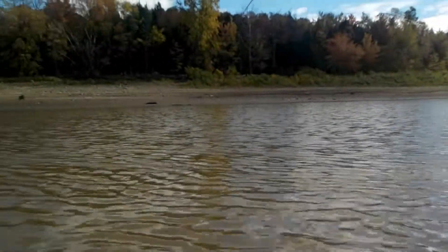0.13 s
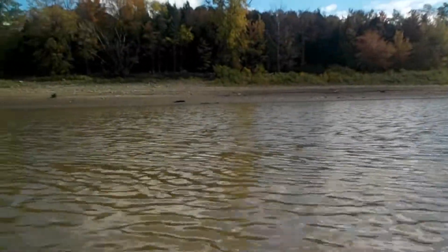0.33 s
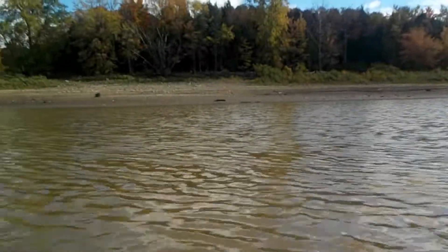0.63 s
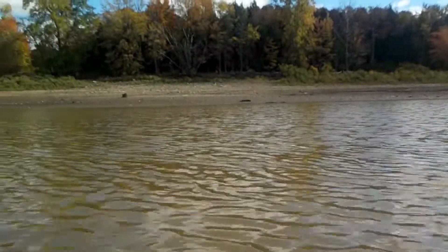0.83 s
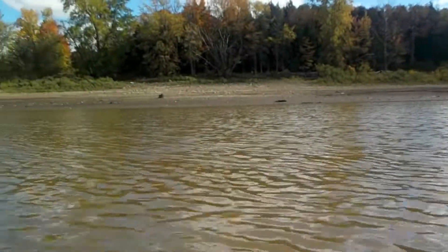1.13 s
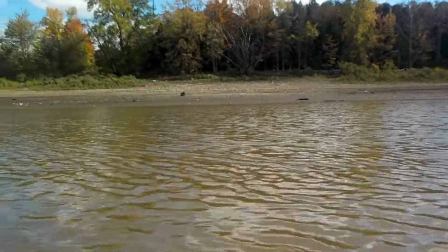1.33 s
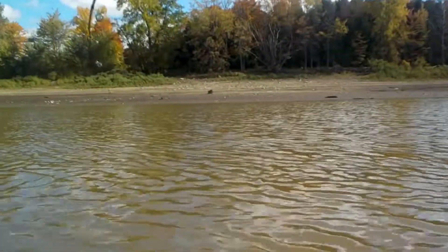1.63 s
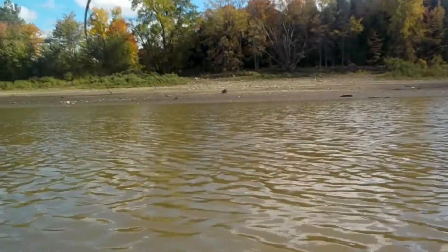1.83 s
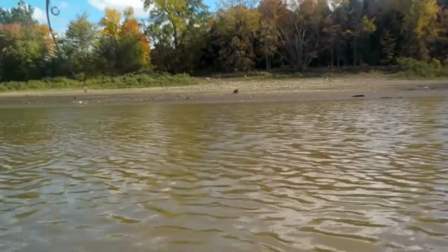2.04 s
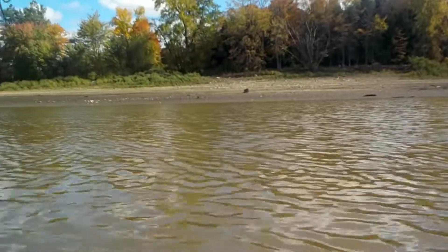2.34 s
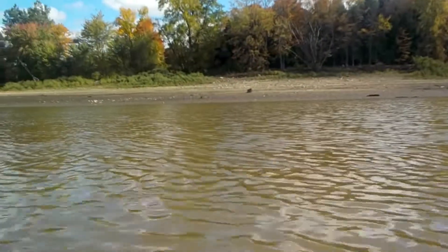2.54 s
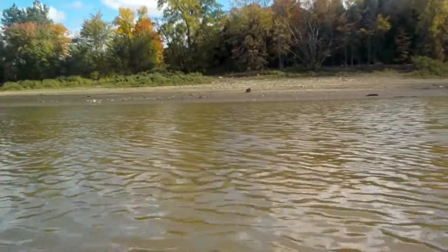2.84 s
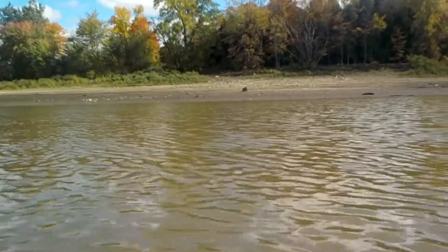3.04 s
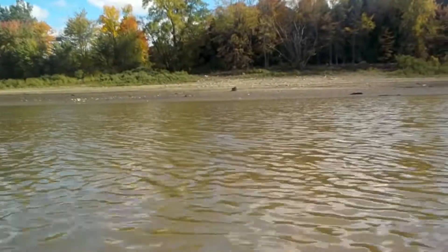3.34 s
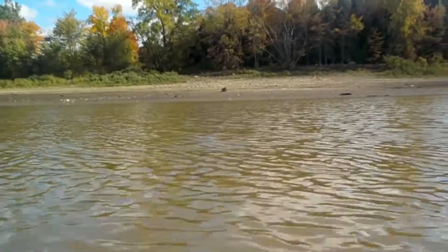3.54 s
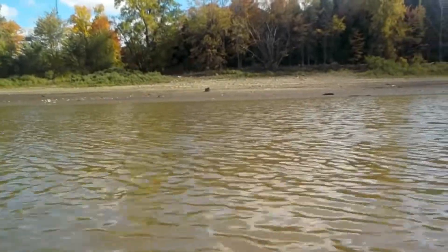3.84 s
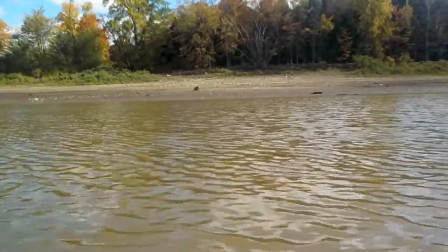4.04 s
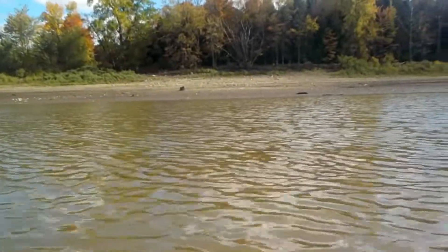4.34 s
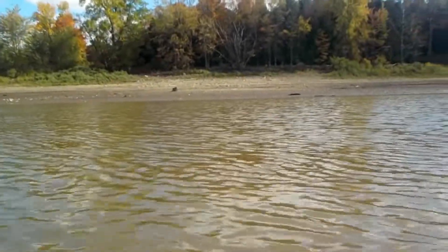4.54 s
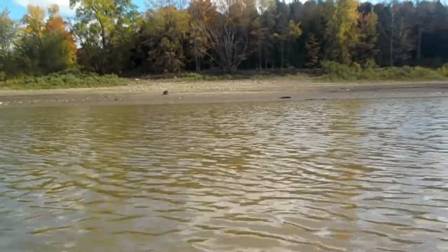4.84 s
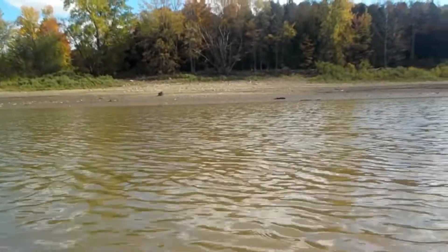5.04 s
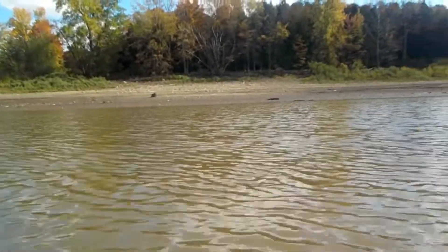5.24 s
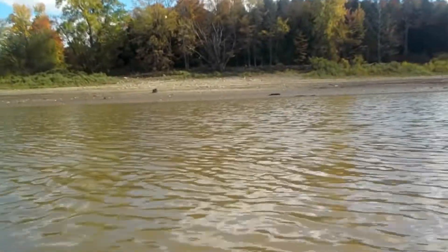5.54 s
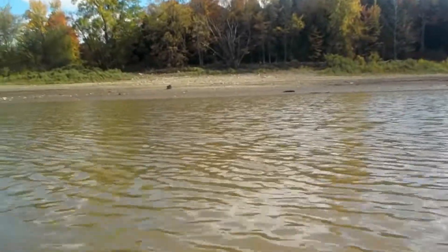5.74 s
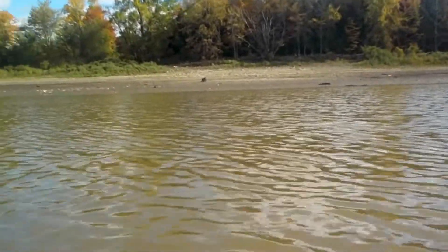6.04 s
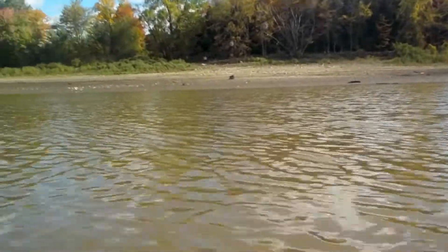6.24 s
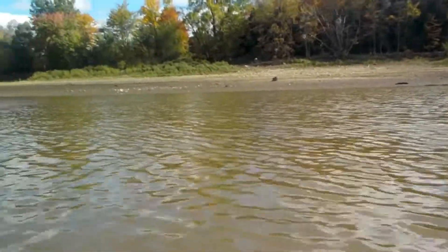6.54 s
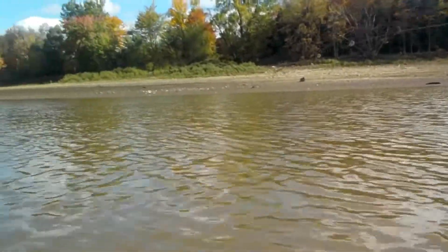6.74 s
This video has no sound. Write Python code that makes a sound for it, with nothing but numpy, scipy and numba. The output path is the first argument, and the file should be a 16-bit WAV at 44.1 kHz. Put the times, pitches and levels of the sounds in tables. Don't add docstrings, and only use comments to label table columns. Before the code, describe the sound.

Close metallic reel clicks quicken to a buzz, stop and restart, pause with small knocks, then burst into a rapid drag scream by quiet water.

```python
import sys
import numpy as np
from scipy import signal
from scipy.fft import rfft, irfft
from scipy.io import wavfile
from scipy.ndimage import uniform_filter1d, map_coordinates
from numba import njit

SR = 44100
rng = np.random.default_rng(int(sys.argv[2]) if len(sys.argv) > 2 else 0)


def master_out(mix):
    frames = np.transpose(np.atleast_2d(mix))
    ceiling = np.clip(frames, -1, 1)
    pcm = np.round(ceiling * 32767).astype(np.int16)
    wavfile.write(sys.argv[1], SR, pcm)


def ratio_of_db(decibels):
    return 10 ** (np.asarray(decibels, float) / 20)


N = 303408


def curve(rows):
    s, *columns = np.transpose(rows)
    return [np.interp(np.arange(N) / SR, s, column) for column in columns]


def across(points):
    hz, value = np.transpose(points)
    return np.interp(np.log(np.arange(N // 2 + 1) * SR / N + 1), np.log(hz + 1), value)


def walk(rate_hz):
    hold = int(SR / rate_hz)
    steps = np.repeat(rng.standard_normal(N // hold + 1), hold)
    return 1.5 * uniform_filter1d(uniform_filter1d(steps, hold), hold)[:N]


@njit
def mode(x, pole):
    y, z = np.empty(len(x)), 0j
    for i in range(len(x)):
        z = z * pole[i] + x[i]
        y[i] = z.imag
    return y


def resonate(x, hz, width_hz):
    r = np.exp(-np.pi * width_hz / SR)
    return signal.lfilter([1 - r], [1, -2 * r * np.cos(2 * np.pi * hz / SR), r * r], x)


def place(at, shapes):
    out = np.zeros(N + shapes.shape[1], shapes.dtype)
    np.add.at(out, at[:, None] + np.arange(shapes.shape[1]), shapes)
    return out[:N]


# pitch_hz, level_db (rms), wander_hz
FAR_TONES = [
    (102.5, -86, .6),
    (12091, -89, 1.0),
]


def far_tones():
    out = 0
    for hz, db, wander_hz in FAR_TONES:
        level = np.sqrt(2) * ratio_of_db(db + 0.83 * walk(3.13))
        out = out + level * np.sin(2 * np.pi * np.cumsum(hz + wander_hz * walk(3.27)) / SR)
    return out


# pitch_hz, level_db (per Hz)
RIVER_SPECTRUM = [(25, -126), (80, -116), (200, -108), (450, -99), (900, -91.5), (1700, -99), (2200, -106),
                  (3000, -114), (3700, -110), (5300, -106), (7200, -112), (9000, -115), (11000, -110),
                  (15500, -108)]
# pitch_hz, likeness (0-1)
RIVER_ALIKE = [(60, 0.95), (130, 0.76), (290, 0.6), (640, 0.88), (1410, 0.78), (3100, 0.94), (6820, 0.43),
               (15000, 0.53)]
# pitch_hz, level_db
RIVER_PAN = [(60, -1), (110, -23), (200, 6), (380, -4.5), (700, -3), (1290, -3), (2380, -1), (4400, -5),
             (8120, -8), (15000, -8)]
RIVER_DB = -60.5


def river():
    alike, side = np.clip(across(RIVER_ALIKE), 0, 1), np.array([[1], [-1]])
    mid, wide = rfft(rng.standard_normal((2, N)))
    mixed = np.sqrt(1 + alike) * mid + side * np.sqrt(1 - alike) * wide
    full = mixed * ratio_of_db(across(RIVER_SPECTRUM) + side * across(RIVER_PAN) / 2)
    octave = across([(20, np.log2(20)), (20480, np.log2(20480))])
    out = 0
    for centre in np.arange(4, 16, 2):
        band = irfft(full * np.clip(1 - np.abs(octave - centre) / 2, 0, 1), N)
        flicker_db = (centre < 13) * (0.7 * walk(1.5) + 0.8 * walk(12))
        out = out + band * ratio_of_db(flicker_db)
    out = out * ratio_of_db(RIVER_DB) / np.sqrt(np.mean(out.mean(axis=0) ** 2))
    return out + far_tones()


# start_s, length_s, level_db
RUB = [
    (0.391, 0.34, -53.5),
    (1.024, 2.44, -62),
    (3.49, .24, -67.5),
]
RUB_SAG = (-41, -0.5, -10)
RUB_HZ, RUB_WIDTH_HZ = 1611, 31.6
RUB_ATTACK_S, RUB_RELEASE_S = 0.033, 0.074


def hum():
    t, loud = np.arange(N) / SR, 0
    for (s, length, db), sag_db in zip(RUB, RUB_SAG):
        swell = np.clip((t - s) / RUB_ATTACK_S, 0, 1)
        release = np.clip(1 + (s + length - t) / RUB_RELEASE_S, 0, 1)
        sagging = ratio_of_db(db + sag_db * np.clip(t - s - RUB_ATTACK_S, 0, length))
        loud = loud + swell * release * sagging
    return loud * resonate(rng.standard_normal(N), RUB_HZ, RUB_WIDTH_HZ) * 8.4


# start_s, level_db (peak), pitch_hz, width_hz, t60_s
KNOCKS = [(3.597, -53, 2300, 900, .03), (3.737, -47.5, 5860, 1480, 0.13), (3.841, -51.5, 5360, 1200, .02),
          (4.227, -80, 1500, 1500, .02), (4.361, -40, 1820, 970, 0.032), (4.358, -44, 6000, 2960, 0.035),
          (4.625, -54, 2200, 1800, 0.024), (4.845, -48, 3500, 4000, 0.032), (4.907, -37, 4940, 4000, 0.011),
          (5.047, -42.5, 1160, 1480, 0.014), (5.231, -48, 900, 900, 0.022), (5.31, -48.5, 1690, 1400, 0.59),
          (5.37, -47, 5000, 3000, 0.012), (5.681, -50, 515, 120, 0.68), (6.19, -43, 690, 300, 0.056),
          (6.835, -56, 131, 110, 0.11)]


def knocks():
    out, t = np.zeros(N), np.arange(6000) / SR
    for s, db, hz, width_hz, t60_s in KNOCKS:
        envelope = np.exp(-np.log(1000) * t / t60_s) * np.minimum(t / 0.0012, 1)
        burst = rng.standard_normal(len(t)) * envelope
        burst = signal.lfilter(*signal.iirpeak(hz, hz / width_hz, SR), burst)
        out += place(np.array([int(s * SR)]), ratio_of_db(db) * burst[None] / np.abs(burst).max())
    return out


# start_s, level_db (snap peak), ring_db
TICKS = [(0.0054, -37.5, -55.5), (0.0446, -36.5, -52.5), (0.094, -34.5, -59.5), (0.1388, -31.5, -68),
         (0.178, -32.5, -53.5), (0.2193, -33, -51), (0.252, -34.5, -54), (0.288, -35.5, -63),
         (0.3251, -37, -57), (0.358, -36.5, -53), (0.387, -40, -53.5), (0.414, -41.5, -48.5),
         (0.444, -39.5, -62), (0.4741, -35.5, -60), (0.506, -36.5, -55), (0.5392, -34, -54),
         (0.5761, -36, -55.5), (0.6193, -36.5, -73), (0.6842, -38.5, -57), (0.784, -37, -55),
         (0.8615, -35, -52.5), (0.9252, -38, -50), (0.982, -39, -59), (1.046, -35, -60.5),
         (1.1025, -33.5, -55), (4.122, -33.5, -63.5), (5.442, -36.5, -64.5), (5.5155, -39, -66),
         (5.5566, -42, -61), (5.5854, -38, -56)]
TICK_DB = 23.5


def lone_ticks():
    start_s, snap_db, ring_db = np.transpose(TICKS)
    face_db = 1.6 * rng.standard_normal((len(start_s), 4)) * [0, 1, 1, 1]
    return np.c_[start_s * SR, snap_db + TICK_DB, ring_db, face_db]


# start_s, speed_teeth_per_s
FIRST_PULL = [
    (1.14, 28.0),
    (1.179, 48.1),
    (1.402, 85.1),
    (1.528, 89.4),
    (1.606, 125.9),
    (1.701, 144.6),
    (1.776, 108.3),
    (1.849, 42.7),
]
SECOND_PULL = [
    (2.092, 59.0),
    (2.146, 83.9),
    (2.316, 70.3),
    (2.534, 25.3),
]
THIRD_PULL = [
    (2.74, 76.4),
    (2.89, 82.7),
    (3.081, 53.7),
    (3.18, 79.8),
    (3.303, 54.6),
    (3.422, 102.5),
    (3.507, 16.6),
]
# start_s, speed_teeth_per_s
DASH = [
    (5.603, 76),
    (5.645, 76),
    (5.723, 509.7),
    (5.801, 640.2),
    (5.963, 269.1),
    (6.049, 222.2),
    (6.116, 115.0),
]
SECOND_DASH = [
    (6.167, 148),
    (6.305, 482),
    (6.372, 355),
    (6.426, 302),
    (6.53, 270),
    (6.562, 245),
    (6.6, 255),
    (6.655, 190),
    (6.88, 211),
]
# once_db, once_tooth, twice_db, twice_tooth (per turn)
FACES = [
    (2.4, 1.6, 0.8, 1.8),
    (0.7, 12, 2.3, 8.9),
    (1, 9.8, 2.3, 8.5),
    (1.6, 1.2, 2.2, 9.6),
]
DASH_FACES = [
    (2.2, 2, 1, 0.5),
    (3, 16, 2.6, 6.2),
    (2.8, 16.3, 2.6, 6.5),
    (2, 18.5, 1.7, 9),
]
FIRST_TOOTH = 0, 13
TURN_DEPTH = 1.2, .95
SNAP_DB = (-13, -13.5)
SNAP_SLOPE = (0.17, 0.3)
RING_DB = (-22, -20)
RING_FADE = (-4, -7.5)
TOOTH_SCATTER_DB = np.array([.8, 1.1, 1.1, 1.1])
TOOTH_JITTER = 0.014
RING_SCATTER_DB, RING_DRIFT_DB = 3, 2
TEETH_PER_TURN = 20
# start_s, body_hz, body_db (to snap), high_ring_db (to low ring), cover_db
GRIP = [(0, 2040, -21.5, -2, 0), (.12, 1930, -23, -25, 0), (.25, 1880, -13.5, -9, 0),
        (.42, 1890, -7, -10, 0), (.54, 1820, -28, -20, 0), (.62, 1800, -19, 9.5, 0),
        (.79, 1880, -36, -5, 0), (1.05, 1800, -15.5, 2, -0.5), (1.3, 2100, -18.5, -15, 0),
        (1.55, 2050, -18, -8, -1), (1.72, 1760, -9, -6, 0), (2.2, 1712, -5.5, -21, 2.5),
        (3.2, 1717, -4, -19, -0.5), (3.45, 1700, -8.5, -12, 2.5), (5.45, 1720, -12.5, 2, -10),
        (5.62, 1770, -2, -12, -1.5), (5.8, 1698, -5.5, -1, 1), (6.88, 1720, -5.5, -6, 2)]


def spool_run(speeds, faces, first_tooth, depth, snap_db, slope_db, ring_db, fade_db):
    start = int(speeds[0][0] * SR)
    rate = curve(speeds)[0][start:int(speeds[-1][0] * SR) + 40]
    turned = np.cumsum(rate) / SR
    tooth = np.arange(int(turned[-1]) + 1)[:, None]
    at = np.minimum(np.searchsorted(turned, tooth[:, 0]), len(rate) - 1)
    speed = rate[at]
    chance = rng.standard_normal((len(at), 6))

    db = snap_db + slope_db * np.log2(speed / 100) + curve(GRIP)[3][start + at]
    ring = db + ring_db + fade_db * at / SR - 5.5 * np.log10(SR / speed)
    ring += RING_SCATTER_DB * chance[:, 5] + RING_DRIFT_DB * walk(6)[start + at]

    once_db, once_tooth, twice_db, twice_tooth = np.transpose(faces)
    tooth_angle = 2 * np.pi / TEETH_PER_TURN
    angle = tooth_angle * (tooth + first_tooth)
    face = once_db * np.cos(angle - tooth_angle * once_tooth)
    face = face + twice_db * np.cos(2 * (angle - tooth_angle * twice_tooth))
    face_db = depth * face + TOOTH_SCATTER_DB * chance[:, 1:5]
    return np.c_[start + at + TOOTH_JITTER * chance[:, 0] * SR / speed, db, ring, face_db]


def ratchet():
    speeds = (FIRST_PULL + SECOND_PULL + THIRD_PULL, DASH + SECOND_DASH)
    rows = [lone_ticks()]
    for settings in zip(speeds, (FACES, DASH_FACES), FIRST_TOOTH, TURN_DEPTH,
                        SNAP_DB, SNAP_SLOPE, RING_DB, RING_FADE):
        rows.append(spool_run(*settings))
    return np.vstack(rows).T


# pitch_hz, width_hz, level_db
SNAP = [(1120, 900, -68), (2800, 92, -21), (3220, 280, -24), (4430, 2040, -22), (5140, 247, -13),
        (5541, 420, -7.5), (6010, 860, -5.5), (6450, 750, -17.5), (6987, 395, -12.5), (8980, 1500, -36),
        (10600, 140, -52), (11045, 240, -18), (13300, 1100, -42)]
SNAP_FACE = 0, 4, 3, 3, 1, 2, 2, 2, 3, 3, 3, 4, 3
PITCH_TURN, PITCH_SCATTER, STEADY_HZ = 0.022, 0.008, 8000


def snaps(at, db, face_db, rough=0.7, bounce_s=0.0016, rattle_s=0.00063):
    t = np.arange(400) / SR
    landing = np.minimum(t / 0.0006, 1) * np.exp(-t / rattle_s)
    bounce = 1.53 * (t > bounce_s) * np.exp(-np.abs(t - bounce_s) / rattle_s)
    angle = 2 * np.pi * np.arange(len(at))[:, None] / TEETH_PER_TURN
    worn = rng.standard_normal((3, len(t)))
    texture = 1.76 * worn[0] + np.cos(angle) * worn[1] + np.sin(angle) * worn[2]
    texture = texture + rough * rng.standard_normal((len(at), len(t)))
    blows = (landing + bounce) * texture

    lower, upper = np.zeros((2,) + blows.shape)
    for (hz, width_hz, mode_db), face in zip(SNAP, SNAP_FACE):
        shape = resonate(resonate(blows, hz, width_hz), hz, 1.48 * width_hz)
        shape = shape / np.sqrt(np.mean(np.sum(shape ** 2, axis=1)))
        group = upper if hz > STEADY_HZ else lower
        group += ratio_of_db(db + mode_db + face_db[face])[:, None] * shape

    stretch = 1 + PITCH_TURN * np.sin(2 * angle) + PITCH_SCATTER * rng.standard_normal(angle.shape)
    row = np.arange(len(at))[:, None]
    shifted = map_coordinates(lower, np.broadcast_arrays(row, stretch * np.arange(len(t))), order=3)
    return place(at, upper + shifted)


def body(at, level_db, body_hz):
    knock = place(at + 14, ratio_of_db(level_db - 39)[:, None]) + 0j
    turn = 2j * np.pi * body_hz / SR
    once = mode(knock, np.exp(turn - np.pi * 170 / SR))
    return mode(once + 0j, np.exp(turn - np.pi * 480 / SR))


# early_hz, dash_hz (in the fast run)
RINGS = [
    (4371, 4409),
    (5437, 5485),
]
# t60_s, kept_share (0-1, survives the next slow snap)
RING_DECAY = [
    (0.4, 0.35),
    (0.73, 0),
]


def rings(at, low_db, high_db):
    out = np.zeros(N)
    for hz, (t60_s, keep), ring_db in zip(RINGS, RING_DECAY, (low_db, high_db)):
        early, late = np.exp(2j * np.pi * np.array(hz) / SR - np.log(1000) / (t60_s * SR))
        pole = np.where(np.arange(N) < DASH[0][0] * SR, early, late)
        contact = np.clip(np.gradient(at) / (0.082 * SR), 0.05, 1)
        left = np.clip(keep, 0.01, 0.9) ** contact
        pole[at] *= left
        phase = np.exp(1j * 2.16 * rng.standard_normal(len(at)))
        kick = ratio_of_db(ring_db + 4) * np.sqrt(1 - left ** 2) * phase
        out += signal.lfilter(*signal.iirpeak(hz[0], 6, SR), mode(place(at, kick[:, None]), pole))
    return out


def reel():
    at, db, low_db, *face_db = ratchet()
    at = np.clip(at, 0, N - 1).astype(int)
    body_hz, body_db, tilt_db, _ = curve(GRIP)
    body_db, high_db = body_db[at], low_db + tilt_db[at]
    face_db.append(body_db + 0.93 * face_db[0])
    out = snaps(at, db, face_db)
    out += body(at, db + body_db + face_db[0], body_hz)
    out += rings(at, low_db, high_db)
    return signal.sosfilt(signal.butter(4, 1350, "high", fs=SR, output="sos"), out)


def rod_shake(spool):
    tremble = resonate(np.diff(rng.standard_normal(N + 1)), 660, 200)
    return uniform_filter1d(np.abs(spool), size=3000) * tremble


# pitch_hz, level_db (left minus right)
PORT_DB = [(60, -12), (110, 8), (200, -31), (380, 1), (700, -9), (1290, -6.5), (2380, -5), (4400, -2.5),
           (8120, -6), (15000, -10)]
# pitch_hz, lead_rad (left leads)
PORT_RAD = [(0, -4.5), (1890, 0.5), (2410, -1.1), (3700, -1.54), (4220, -1.1), (5000, -1.5), (5770, -2),
            (6200, -1.5), (7060, -2.5), (7410, -2), (9220, -3), (11400, -4), (12100, -10.5), (16000, -14)]
# start_s, level_db (toward the left)
ROD_PAN = [
    (0, 0.5),
    (.6, -1),
    (1.2, 1),
    (2.5, 0.5),
    (3.3, 1),
    (4.1, 1),
    (5.4, 0.5),
    (5.8, 2.5),
    (6.88, 2),
]


def ports(x, echo_db=-12, echo_s=0.0023, fade_s=0.0054):
    side = np.array([[0.5], [-0.5]])
    response = ratio_of_db(side * across(PORT_DB)) * np.exp(1j * side * across(PORT_RAD))
    near = irfft(rfft(x) * response, N) * ratio_of_db(side * curve(ROD_PAN)[0])
    t, sway = np.arange(1800) / SR, 2.0 * walk(3.7)
    for share in np.cos(sway), np.sin(sway):
        envelope = np.exp(-np.abs(t - echo_s) / fade_s) * np.minimum(t / 0.0076, 1)
        tail = rng.standard_normal((2, len(t))) * envelope
        tail = tail / np.sqrt(np.sum(tail ** 2) / 2)
        near = near + ratio_of_db(echo_db) * signal.oaconvolve(near * share, tail, axes=1)[:, :N]
    return near


def scene():
    spool = reel()
    close = spool + ratio_of_db(-5.0) * rod_shake(spool) + hum() + knocks()
    return ports(close) + river()


# pitch_hz, width_hz, level_db
HOUSING = [
    (2463, 217, -14),
    (3013, 192, -15),
    (7967, 423, -15.5),
]
TOP_HZ = 15340


def camera_case(x):
    hz = np.arange(N // 2 + 1) * SR / N
    dips_db = sum(db * np.exp(-((hz - f) / width_hz) ** 2) for f, width_hz, db in HOUSING)
    case_db = dips_db - np.clip((hz - TOP_HZ) / 40, 0, 60)
    return irfft(rfft(x) * ratio_of_db(case_db), N)


GATE_DB, GATE_FOLLOW = -50.5, 0.703


def gate(x):
    hz, _, z = signal.stft(x, SR, nperseg=1024)
    edges = np.arange(0, len(hz), 8)
    power = np.add.reduceat(np.abs(z) ** 2, edges, axis=1).mean(axis=0)
    band_db = 10 * np.log10(uniform_filter1d(power, size=3, axis=1) + 1e-16)
    band_hz = hz[edges, None]
    spare_db = 7 * np.clip((band_hz - 10000) / 3500, 0, 1)
    spare_db = spare_db - 8.0 * np.exp(-((band_hz - 8900) / 1300) ** 2)
    threshold_db = GATE_DB + GATE_FOLLOW * band_db.max(axis=0)
    weak = (band_db + spare_db < threshold_db) & (band_hz > 2200)
    kept = 1 - 0.97 * np.repeat(weak, 8, axis=0)[:len(hz)]
    return signal.istft(z * kept, SR, nperseg=1024)[1][:, :N]


def top_cut(x):
    return signal.sosfilt(signal.butter(12, 16470, fs=SR, output="sos"), x)


def record(dry):
    mix = gate(camera_case(dry))
    return top_cut(mix)


dry = scene()
out = record(dry)
master_out(out)
```